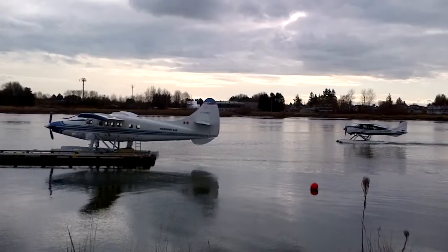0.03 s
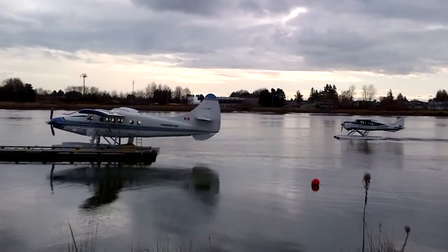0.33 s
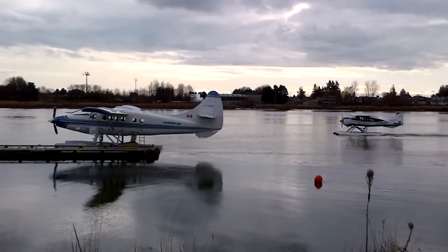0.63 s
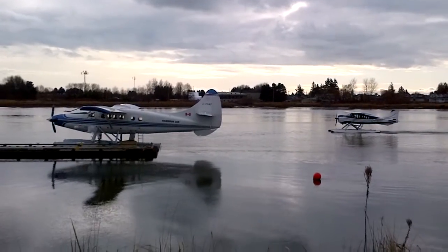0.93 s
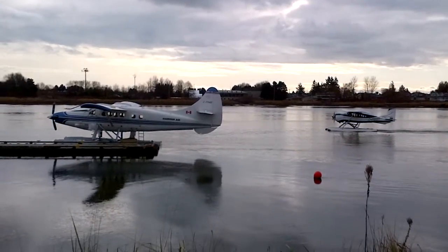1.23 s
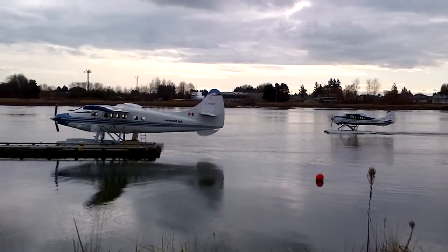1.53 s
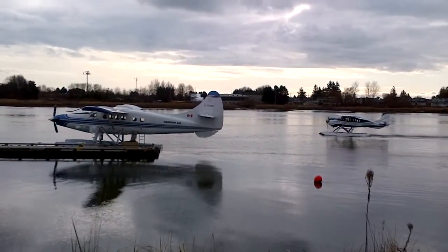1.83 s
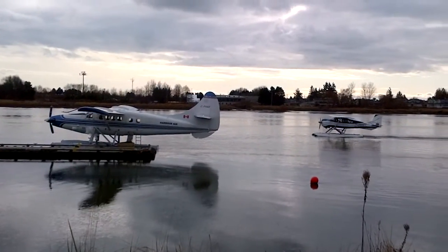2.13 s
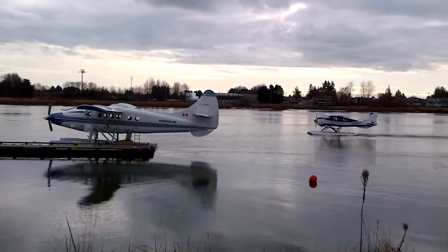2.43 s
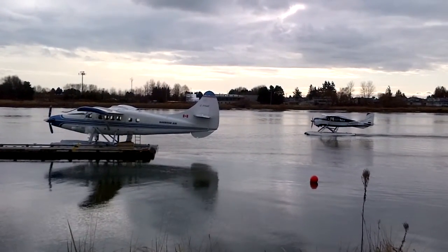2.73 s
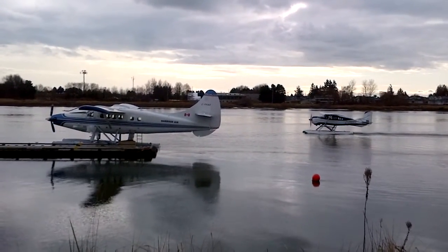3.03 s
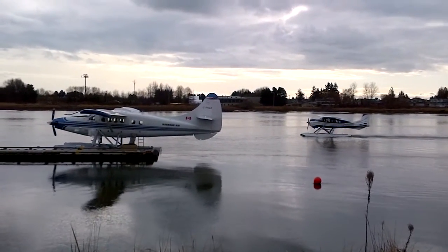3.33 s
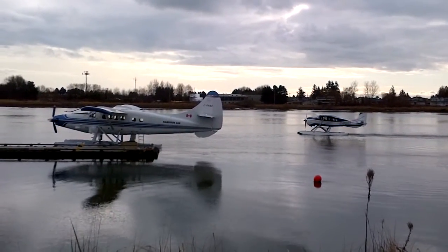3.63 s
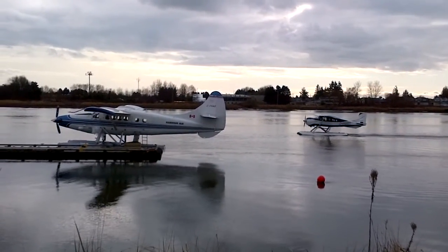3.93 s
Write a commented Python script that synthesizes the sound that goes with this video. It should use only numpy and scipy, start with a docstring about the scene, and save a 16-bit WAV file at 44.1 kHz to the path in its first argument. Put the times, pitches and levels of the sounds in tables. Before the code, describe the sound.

Low, uneven piston engine chugging from a taxiing floatplane, with rattles and a propeller drone.

```python
"""A floatplane taxis slowly over calm water, heard from the shore. From the first moment its piston engine
idles in an uneven round of exhaust beats: each a deep thump, a bark of the pipe and a crackling puff of
gas, while valves tick and metalwork rattles. Hard clacks and spits of gas soon join, and within a second
a drone of steady pitch swells underneath. Later come louder valve clinks, and right to the end a second
propeller slowly speeds up."""
import sys
import numpy as np
from scipy import signal
from scipy.fft import rfft, irfft
from scipy.io import wavfile
from scipy.ndimage import uniform_filter1d

SR = 44100
rng = np.random.default_rng(int(sys.argv[2]) if len(sys.argv) > 2 else 0)


def dump_mix(stems):
    """Bounce the given channels to the path in sys.argv[1] as a 16-bit WAV at rate SR."""
    frames = np.atleast_2d(stems).T  # one column per channel
    limited = np.clip(frames, -1, 1)  # hard clip at full scale
    pcm = np.round(limited * 32767).astype(np.int16)
    wavfile.write(sys.argv[1], SR, pcm)


N = 176400

# idle speed: time_s, beat_rate_hz
BEAT_RATE = [(0, 64.55), (1.2, 64.45), (1.7, 64.75), (2.7, 64.72), (4, 64.98)]
# the repeating round, one row per exhaust beat: thump_db, bark_db, bark_hz, gas_db
ROUND = [(-6.0, -12.0, 560.0, -5.5), (-4.0, 0.0, 608.0, -3.0), (-3.0, -2.0, 565.0, -3.5),
         (-0.5, -13.0, 525.0, -0.5), (0.0, -5.5, 535.0, -1.0), (-3.5, -13.0, 575.0, -2.5),
         (-6.0, -6.0, 590.0, -2.5), (-2.5, -7.0, 535.0, -5.5), (-3.5, -9.0, 525.0, -3.0),
         (-9.0, -21.0, 550.0, -10.0), (-16.0, -18.0, 555.0, -12.0), (-7.0, -4.0, 582.0, -5.5),
         (-4.5, -13.0, 550.0, -0.5), (-2.5, -7.0, 522.0, 0.0), (-7.0, -20.0, 555.0, -9.0),
         (-7.0, -8.0, 565.0, -3.0), (-3.0, -12.0, 515.0, -3.0), (-3.0, -12.0, 530.0, -1.5)]
# spectrum of the gas at the start and at the end: frequency_hz, gain_db
GAS_FIRST = [(410, -32), (700, -8), (931, -9.5), (1130, -4), (1360, -8), (1540, -9), (1920, -11.5),
             (2730, -8), (2990, -10.5), (3730, -12.5), (4030, -15.5), (5860, -16), (6340, -12), (8760, -12),
             (11500, -23), (15500, -45)]
GAS_LAST = [(410, -35), (700, -3.5), (873, -11), (1090, -3), (1320, -9.5), (1580, -6.5), (2160, -9.5),
            (2370, -8.5), (2990, -8.5), (3270, -9.5), (3870, -11.5), (5640, -9.5), (6850, -12),
            (11200, -29), (15500, -59)]
# swell of the gas: time_s, gain_db
GAS_SWELL = [(0, -3), (.35, -2.5), (.55, 1.5), (.8, 0.5), (1.3, -.5), (1.7, .7), (2.1, -.3), (2.55, 2),
             (2.9, 0), (3.5, .8), (4, 1.2)]
# resonances of the exhaust stack: centre_hz, width_hz, lift_db
STACK_MODES = [(718, 32, 2.5), (770, 35, 2.5), (1050, 75, 3.5), (1592, 120, 5.5), (2710, 170, 4),
               (3200, 98, 4.5), (3610, 120, 4.5), (5230, 115, 4), (5750, 100, 4.5)]
# spectra of the exhaust rumble and the even hiss: frequency_hz, gain_db
RUMBLE_SPECTRUM = [(15, -12), (30, -4), (39, -17), (53, 2.5), (75, 0), (115, 3), (138, -6.5), (185, -2),
                   (230, -3.5), (290, -6), (350, -14), (430, -10.5), (500, -7.5), (610, -11), (720, -15),
                   (850, -17.5), (1100, -19.5), (1350, -26), (1700, -28), (3000, -33), (5000, -37),
                   (9000, -46), (12000, -52), (15500, -54)]
HISS_SPECTRUM = [(300, -20), (1000, 0), (2000, -4), (2800, -2), (4000, -6), (5600, -6), (8000, -16),
                 (15500, -35)]
# valve ticks within a round: place_beats, gain_db
TICKS = [(.6, -6), (4.5, -2.5), (5.6, -1), (14.6, -2)]
# louder valve clinks: start_s, level_db
CLINKS = [(1.342, -27), (1.481, -24), (1.957, -30), (2.018, -30), (2.876, -30), (3.130, -29), (3.979, -30)]
# modes of the valve gear and of the metalwork: pitch_hz, gain_db
VALVE_MODES = [(2390, 0), (2820, -10), (3200, -13), (3750, -13), (5300, -14)]
METAL_MODES = [(1050, -4), (1600, -3), (1950, -7), (2390, -2), (2670, -4), (2830, -1), (3190, -2),
               (3420, -4), (3590, -2), (3755, -1), (4450, -5), (4900, -5), (5210, -2), (5380, -2),
               (5690, -2), (6900, -9), (8500, -10)]
# speed of the second propeller: time_s, blade_rate_hz
BLADE_RATE = [(0, 77.5), (.6, 83), (1.1, 88.5), (1.6, 92), (2.2, 94), (3, 97.5), (4, 101)]
# harmonics of the propeller and the drone: multiple, level_db
PROP_HARMONICS = [(1, -20.5), (2, -33), (3, -38), (4, -42), (5, -43)]
DRONE_HARMONICS = [(1, -28), (2, -26.5), (3, -33.5), (4, -45)]
# swells of the propeller and the drone: time_s, gain_db
PROP_SWELL = [(0, -4), (.7, 0), (2.3, 1), (3.2, .5), (4, .5)]
DRONE_SWELL = [(0, -6), (.5, -4), (.75, 2.5), (1.3, 2), (2.2, .5), (3.2, -1), (4, -2.5)]
# hard clacks of the metalwork: start_s, gain_db
CLACKS = [(.191, -3), (1.434, -4), (1.573, -1.5), (1.712, -2), (2.129, -2.5), (2.411, -.5), (2.560, -3),
          (2.686, -2.5), (2.962, -2), (3.106, -5), (3.243, -1), (3.524, -2.5), (3.657, -.5), (3.796, -1.5),
          (3.933, 1.5)]
# first contact and rebounds of a clack: delay_s, gain_db
BOUNCES = [(0, 0), (.005, -4), (.016, -4)]
# spits of gas: start_s, gain_db
SPITS = [(.474, -2), (.549, 0), (.597, -2), (.740, -3), (.752, -1), (.890, 0), (.922, 0), (1.004, -4),
         (1.016, -2), (1.064, -1), (1.436, -5), (1.575, -4), (1.686, -5), (1.714, -3), (1.727, -3),
         (2.131, -3), (2.500, -2), (2.563, 0), (2.688, -5), (3.255, -5)]
# spectrum of a spit: frequency_hz, gain_db
SPIT_SPECTRUM = [(500, -30), (1500, -10), (3000, -3), (6300, -3), (8800, 0), (10500, -8), (12000, -16),
                 (13000, -26), (15500, -33)]
# phase of the left channel relative to the right: frequency_hz, lead_rad
LEFT_LEAD = [(10, 0.5), (65, 0.14), (300, 0.47), (700, -0.46), (1350, -2.5), (1650, -1.2), (2400, -1),
             (3600, -2), (5200, -2), (6000, -2.5), (9100, -5), (10200, -6), (15000, -5)]
# scattered part of the sound: frequency_hz, power_share
DIFFUSE_SHARE = [(60, .001), (130, 0.0091), (280, 0.038), (600, 0.067), (1200, 0.4), (2400, 0.1),
                 (5000, 0.1), (9000, 0.22), (14000, 0.12)]

TIME_S = np.arange(N) / SR
FREQUENCY_HZ = np.maximum(np.arange(N // 2 + 1) * SR / N, 1)


def undb(db):
    """Decibels to amplitude ratio."""
    return 10 ** (np.asarray(db) / 20)


def level(x, db):
    """Scale to an rms level."""
    return x * undb(db) / np.sqrt(np.mean(x ** 2))


def curve(rows):
    """Interpolate (time_s, value) rows linearly."""
    return np.interp(TIME_S, *np.array(rows).T)


def across(rows):
    """Interpolate (frequency_hz, value) rows on a logarithmic axis."""
    hz, value = np.array(rows).T
    return np.interp(np.log(FREQUENCY_HZ), np.log(hz), value)


def colour(x, db):
    """Zero-phase filtering by a gain per frequency."""
    return irfft(rfft(x) * undb(db), N)


def walk(rate_hz):
    """Smooth random fluctuation of unit standard deviation."""
    size = max(int(SR / rate_hz), 2)
    held = np.repeat(rng.standard_normal(N // size + 2), size)
    smooth = uniform_filter1d(held[rng.integers(size):][:N], size)
    return smooth / smooth.std()


def pulse(t, rise_s, fall_s):
    """Exponential attack and decay from t = 0."""
    after = np.maximum(t, 0)
    return (1 - np.exp(-after / rise_s)) * np.exp(-after / fall_s)


def superpose(times, shape):
    """Sum shape(event number, seconds from the event) over all events."""
    out, reach = np.zeros(N), SR // 20
    for k, at in enumerate(times):
        i = np.arange(max(int(at * SR) - reach, 0), min(int(at * SR) + reach, N))
        out[i] += shape(k, i / SR - at)
    return out


def beat_times(beats):
    """Times at which the integral of the beat rate reaches the given counts."""
    count = np.cumsum(curve(BEAT_RATE)) / SR
    past_end_s = np.maximum(beats - count[-1], 0) / BEAT_RATE[-1][1]
    return np.interp(beats, count, TIME_S) + past_end_s


def thumps(times, db):
    """Pressure oscillation: one cycle per beat, scaled by its strength; weak beats come slightly late."""
    lag_s, jitter_s, late_s_per_db = .002, .0007, .00005
    scatter, jitter = rng.standard_normal((len(times), 2)).T
    peaks = times + lag_s + jitter_s * jitter - late_s_per_db * (db - db.mean())
    size = np.interp(TIME_S, times, undb(db + 1.3 * scatter))
    cycles = np.interp(TIME_S, peaks, np.arange(len(peaks)))
    return level(size * np.cos(2 * np.pi * cycles), db=-8.8)


def barks(times, db, hz):
    """Damped resonance: each beat rings the pipe roughly for a few cycles."""
    lead_s, jitter_s = .0102, .0002
    scatter, detune, jitter = rng.standard_normal((len(times), 3)).T
    size = undb(db + .6 * scatter)
    pitch = hz * (1 + .018 * detune)

    def ring(k, t):
        return size[k] * pulse(t, rise_s=.007, fall_s=.0074) * np.sin(2 * np.pi * pitch[k] * t)

    rings = superpose(times - lead_s + jitter_s * jitter, ring)
    roughness = 1 + .3 * walk(rate_hz=300)
    return level(rings * roughness, db=-28)


def gas_flow(times, db):
    """Pulsating flow: the envelope of one puff per beat, uneven in size and timing."""
    lead_s, jitter_s = .011, .0016
    scatter, jitter = rng.standard_normal((len(times), 2)).T
    size = undb(db + scatter)
    starts = times - lead_s + jitter_s * jitter
    flow = superpose(starts, lambda k, t: size[k] * pulse(t, rise_s=.006, fall_s=.012))
    return level(flow, db=0)


def flicker(x, depth_db=2.1, rate_hz=40):
    """Amplitude modulation: eight bands, half an octave apart, flare and fade independently."""
    spectrum = rfft(x)
    place = np.clip(2 * np.log2(FREQUENCY_HZ / 1000), 0, 7)
    bands = (irfft(spectrum * np.maximum(1 - np.abs(place - k), 0), N) for k in range(8))
    return sum(band * undb(depth_db * walk(rate_hz)) for band in bands)


def gas(flow):
    """Jet noise: crackling puffs filtered by the stack's resonances; colour shifts as the plane moves."""
    crackle = undb(1.8 * walk(rate_hz=700))
    jet = flicker(flow * crackle * rng.standard_normal(N))
    stack_db = sum(db / (1 + (2 * (FREQUENCY_HZ - hz) / width) ** 2) for hz, width, db in STACK_MODES)
    first, last = (level(colour(jet, across(rows) + stack_db), db=0) for rows in (GAS_FIRST, GAS_LAST))
    blend = np.linspace(0, 1, N)
    return (first * (1 - blend) + last * blend) * undb(curve(GAS_SWELL) - 33.1)


def rumble(flow):
    """Turbulence: mostly low noise whose amplitude throbs as a power of the gas flow."""
    turbulence = flow ** .55 * rng.standard_normal(N)
    return level(colour(turbulence, across(RUMBLE_SPECTRUM)), db=-21.6)


def hiss():
    """Stationary broadband noise fills the gaps between the beats."""
    return level(colour(rng.standard_normal(N), across(HISS_SPECTRUM)), db=-41)


def struck_metal(times, db, modes, ring_s, scatter_db, detune):
    """Modal vibration: every impact excites its own mix of decaying sinusoids."""
    hz, mode_db = np.array(modes).T
    scatter, mistune, polarity = rng.standard_normal((len(times), 3, len(hz))).swapaxes(0, 1)
    size = undb(db[:, None] + mode_db + scatter_db * scatter) * np.sign(polarity)
    pitch = hz * (1 + detune * mistune)
    t = np.arange(SR // 25) / SR
    out = np.zeros(N + len(t))
    for at, sizes, pitches in zip(times, size, pitch):
        if 0 <= at * SR < N:
            ring = sizes @ np.sin(2 * np.pi * np.outer(pitches, t))
            out[int(at * SR):][:len(t)] += np.exp(-t / ring_s) * ring
    return out[:N]


def valves(rounds):
    """Impacts ring the valve gear: soft ticks at set places in each round, and a few louder clinks."""
    gear = dict(modes=VALVE_MODES, ring_s=.011, scatter_db=2.5, detune=.012)
    place, db = np.array(TICKS).T
    beats = (np.arange(rounds)[:, None] * len(ROUND) + place).ravel()
    ticks = struck_metal(beat_times(beats), np.tile(db, rounds) - 40, **gear)
    clinks = struck_metal(*np.array(CLINKS).T, **gear)
    return ticks + clinks


def rattle(times, db):
    """Impact excitation: each beat shakes the loose metalwork, which rings in its modes."""
    lead_s, jitter_s = .006, .003
    contacts = times - lead_s + jitter_s * rng.standard_normal(len(times))
    return struck_metal(contacts, db - 42.5, METAL_MODES, ring_s=.008, scatter_db=5.3, detune=.01)


def hum(hz, harmonics, waver_db):
    """Harmonic series on a slightly wandering fundamental; each partial wavers in level."""
    pitch = hz * (1 + .003 * walk(rate_hz=5))
    phase = 2 * np.pi * np.cumsum(pitch) / SR
    out = np.zeros(N)
    for multiple, db in harmonics:
        amplitude = np.sqrt(2) * undb(db + waver_db * walk(rate_hz=7))
        out += amplitude * np.sin(multiple * phase + 2 * np.pi * rng.random())
    return out


def propeller():
    """Blade-passing tone: its pitch rises as the second propeller speeds up."""
    return hum(curve(BLADE_RATE), PROP_HARMONICS, waver_db=2) * undb(curve(PROP_SWELL))


def drone(pitch_hz=82.4):
    """A low harmonic tone of steady pitch swells, then slowly recedes."""
    return hum(pitch_hz, DRONE_HARMONICS, waver_db=1.8) * undb(curve(DRONE_SWELL))


def clacks():
    """Elastic rebound: each hard impact rings the metalwork, then strikes twice more, softer."""
    metal = dict(modes=METAL_MODES, ring_s=.008, scatter_db=2, detune=.01)
    starts, db = np.array(CLACKS).T
    return sum(struck_metal(starts + delay_s, db + gain_db - 32, **metal) for delay_s, gain_db in BOUNCES)


def spits():
    """Transient jet noise: sudden bright bursts of gas leave the stack."""
    starts, db = np.array(SPITS).T
    bursts = superpose(starts, lambda k, t: undb(db[k]) * pulse(t, rise_s=.0015, fall_s=.008))
    return level(colour(bursts * rng.standard_normal(N), across(SPIT_SPECTRUM)), db=-45)


def stereo(direct, scattered, balance_db=-.86):
    """Partial coherence: scattered sound and differences of phase and level set left and right apart."""
    share = across(DIFFUSE_SHARE)
    mid = rfft(direct) * np.sqrt(1 - share)
    side = rfft(scattered) * np.sqrt(share)
    channels = []
    for sign in (1, -1):  # left, right
        spectrum = (mid + sign * side) * np.exp(.5j * sign * across(LEFT_LEAD))
        channels.append(irfft(spectrum, N) * undb(sign * balance_db / 2))
    return np.array(channels)


def scene():
    """Superposition of the idling engine, the second propeller and the drone."""
    rounds = int(N / SR * BEAT_RATE[-1][1] / len(ROUND)) + 1
    times = beat_times(np.arange(rounds * len(ROUND)))
    thump_db, bark_db, bark_hz, gas_db = np.tile(np.array(ROUND, float), (rounds, 1)).T
    flow = gas_flow(times, gas_db)

    def engine():
        exhaust = barks(times, bark_db, bark_hz) + gas(flow) + spits() + hiss() + rumble(flow)
        return exhaust + valves(rounds) + rattle(times, gas_db) + clacks()

    direct, scattered = engine(), engine()  # same beats, independent random detail
    tones = propeller() + drone() + thumps(times, thump_db)
    return stereo(direct + tones, scattered)


def record(dry):
    """The sound cuts in; soft saturation rounds its peaks and a low-pass filter removes the top."""
    start_s, ramp_s, ceiling, cutoff_hz = .068, .002, 1.07, 15800
    gate = np.clip((TIME_S - start_s) / ramp_s, 0, 1)
    rounded = dry / (1 + (dry / ceiling) ** 8) ** (1 / 8)
    lowpass = signal.ellip(8, .2, 70, cutoff_hz, fs=SR, output="sos")
    return signal.sosfilt(lowpass, gate * rounded)


dry = scene()
out = record(dry)
dump_mix(out)
```